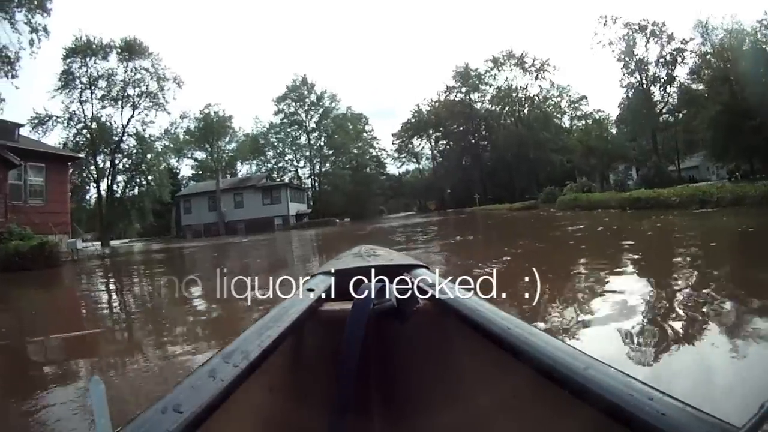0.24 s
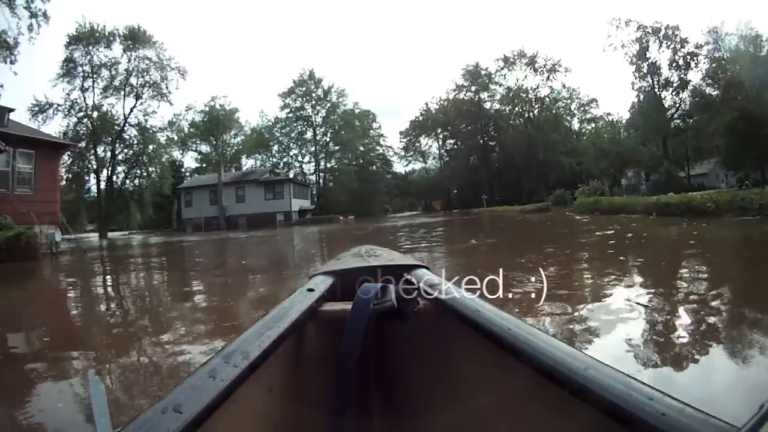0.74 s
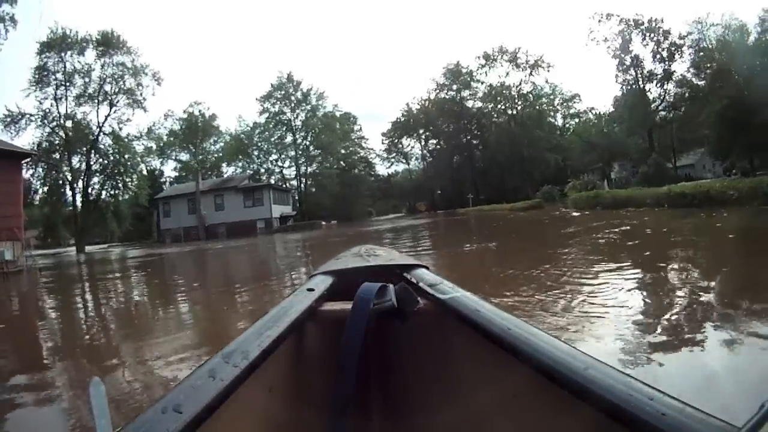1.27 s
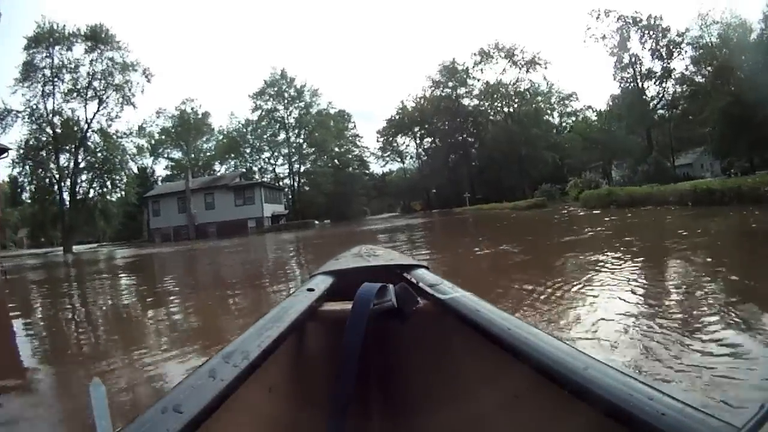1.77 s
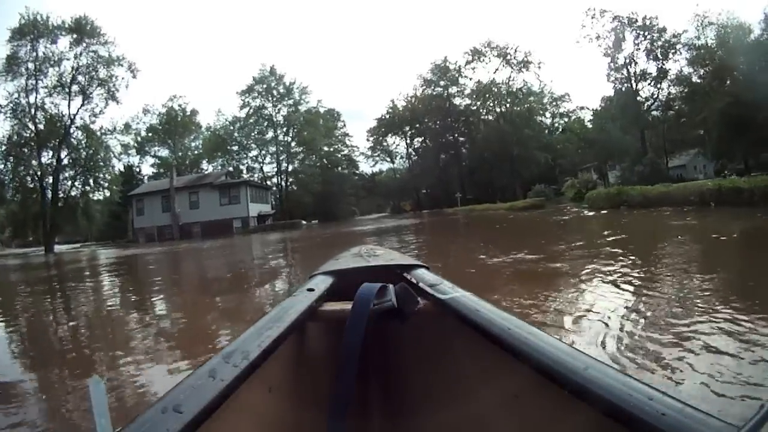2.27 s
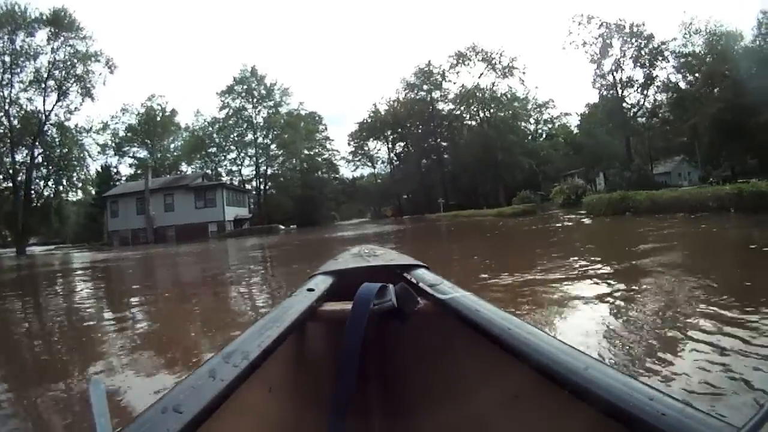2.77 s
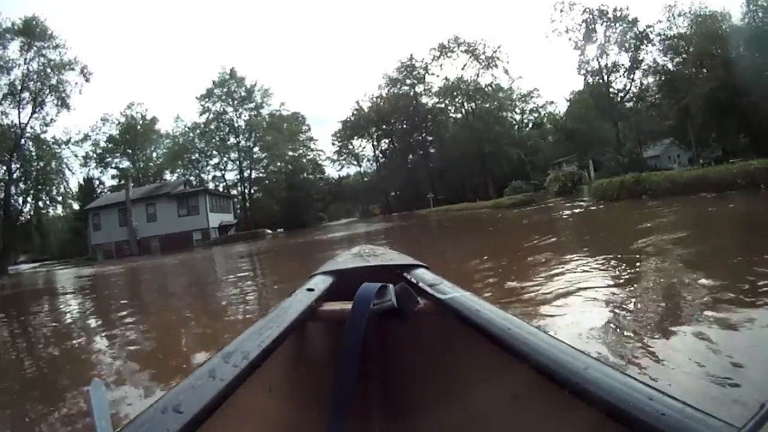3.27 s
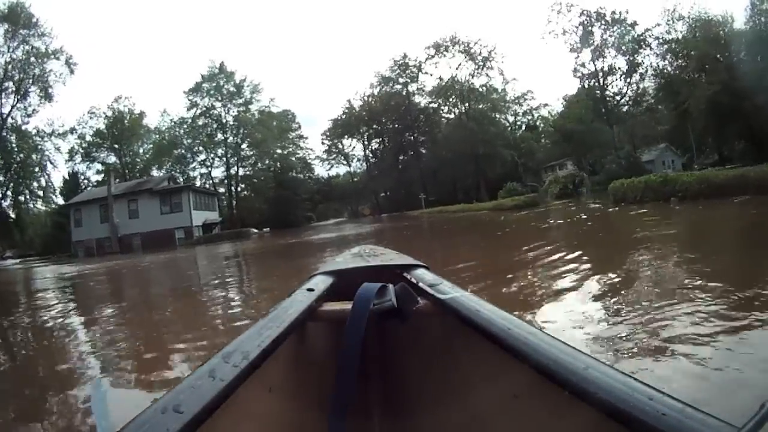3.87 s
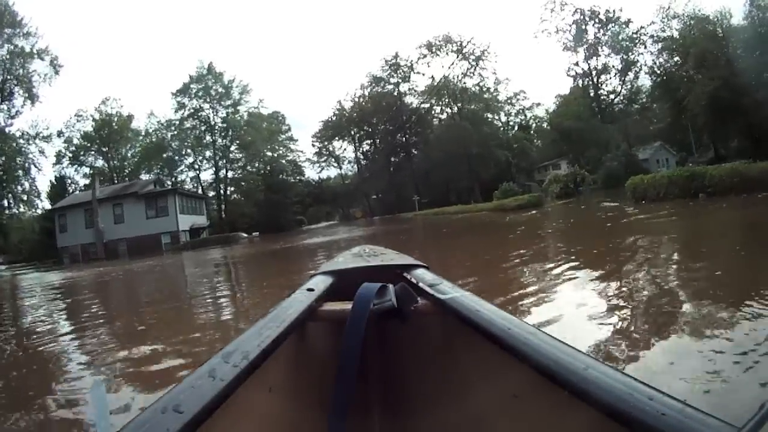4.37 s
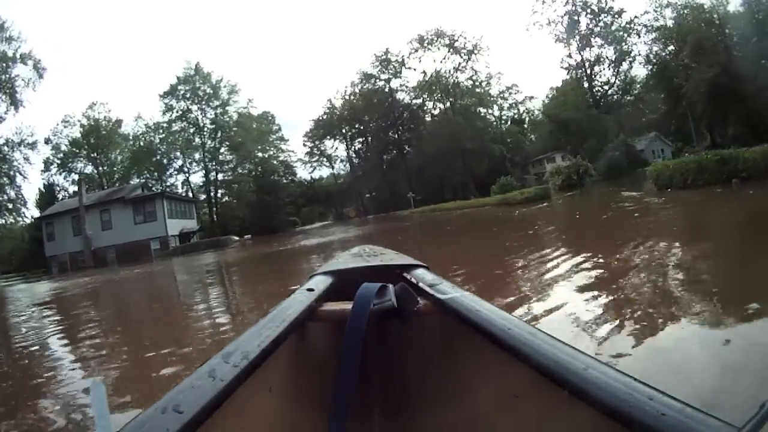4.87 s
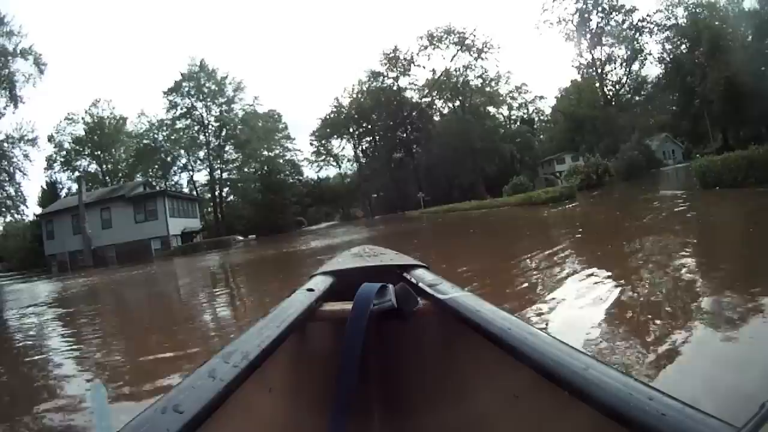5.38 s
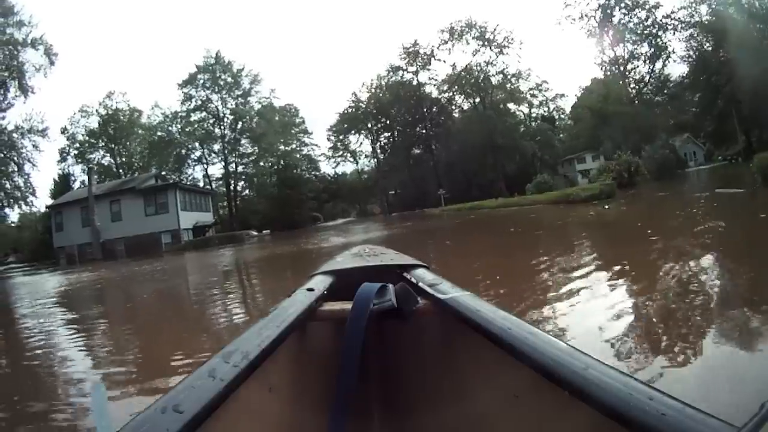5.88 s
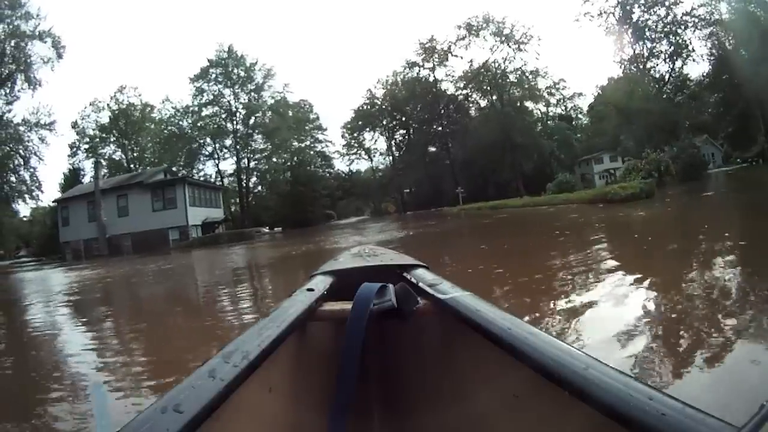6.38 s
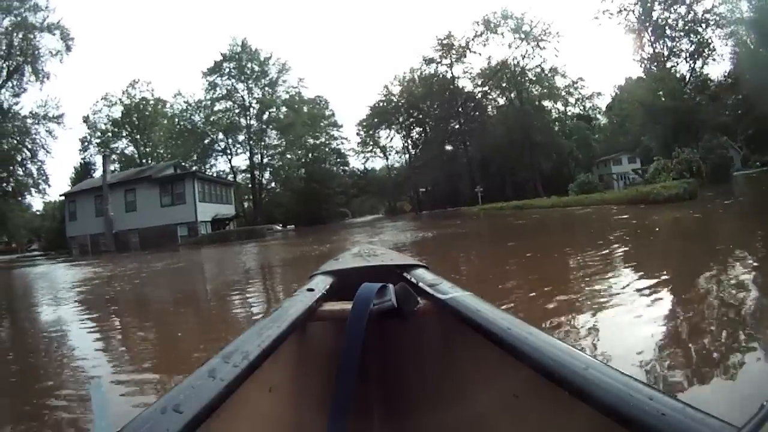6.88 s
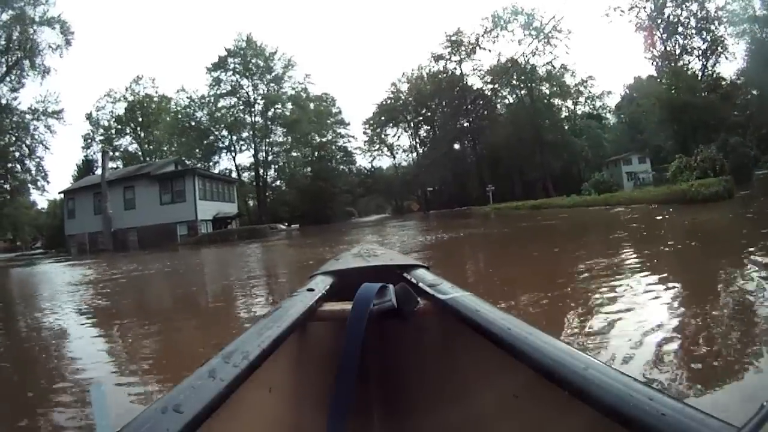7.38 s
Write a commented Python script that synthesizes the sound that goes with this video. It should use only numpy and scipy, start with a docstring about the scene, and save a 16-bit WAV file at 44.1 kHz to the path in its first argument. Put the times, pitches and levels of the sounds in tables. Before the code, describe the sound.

Inside a slowly paddled canoe on calm floodwater, a camera in a closed case near the bow picks up dull hull bumps. A soft thud bobs away at first, a strong deep boom comes around one second, then faint knocks, and another thud near six. Fine ripple crackle, bright drips and small hollow plops continue over a faint even wash.

```python
"""Slow canoe on calm floodwater

A canoe is paddled slowly, with the microphone of a camera in a closed case near the bow.
Soft bumps set the hull booming as decaying modes; it bobs, rumbles and stirs the water beside it.
Wavelets trap air against the hull and plop; near and tiny drops plink as bubbles; noise makes the wash.
The case colours every sound with its resonances; coarse sampling mirrors the band into the treble."""
import sys
import numpy as np
from scipy.fft import rfft, irfft, next_fast_len
from scipy.io import wavfile
from scipy.ndimage import uniform_filter1d, map_coordinates

SR = 44100
rng = np.random.default_rng(int(sys.argv[2]) if len(sys.argv) > 2 else 0)


def transcribe(signal):
    """Save signal, clipped to [-1, 1], as a 16-bit WAV file at the path in sys.argv[1]."""
    frames = np.atleast_2d(signal).T
    limited = np.clip(frames, -1, 1)
    pcm = np.round(limited * 32767).astype(np.int16)
    wavfile.write(sys.argv[1], SR, pcm)


N = 336483

# how rippled the water at the bow is: (t/s, level/dB before offsets)
RIPPLE_LEVEL = [(0.0, -61.5), (0.34, -61.5), (0.87, -60.5), (4.57, -65), (5.82, -63), (6.33, -65),
                (7.37, -61.5), (7.63, -61.5)]


def amp(db):
    """Decibels to gain."""
    return 10 ** (np.asarray(db) / 20)


def unit(x):
    """x scaled to rms 1."""
    return x / np.sqrt(np.mean(x ** 2) + 1e-20)


def add(track, s, sound):
    """Mix a sound into the track from time s on; what falls outside the track is cut off."""
    start = round(s * SR)
    part = sound[max(-start, 0):N - start]
    track[max(start, 0):][:len(part)] += part


def wobble(rate):
    """A smooth random curve, rate knots a second."""
    knots = rng.standard_normal(int(N * rate / SR) + 4)
    return map_coordinates(knots, [np.arange(N) * rate / SR])


def filtered(x, response):
    """x times a complex response of frequency."""
    size = x.shape[-1]
    m = next_fast_len(size + 8192)
    spectrum = rfft(x, m) * response(np.fft.rfftfreq(m, 1 / SR))
    return irfft(spectrum, m)[..., :size]


def coloured(x, spectrum):
    """x shaped by (f/Hz, level/dB) points, at rms 1."""
    hz, db = np.transpose(spectrum)
    return unit(filtered(x, lambda f: amp(np.interp(np.log(f + 1), np.log(hz), db))))


def resonance(f, hz, width):
    """Response of one damped resonator, 1 at its centre."""
    return 1j * f * width / (hz * hz - f * f + 1j * f * width)


def contacts():
    """Bumps, then the soft, even dips of the bobbing hull: (s, dB, corner Hz, side-wall dB, pressing s)."""
    # bumps on the hull: (t/s, level/dB, softness corner f/Hz, side-wall emphasis level/dB)
    knocks_felt = [(-.06, -45, 78.4, 5.5), (.893, -22.5, 57.5, -0.5), (1.441, -57, 94, 1),
                   (1.776, -42, 84.5, 1), (2.451, -59, 96, -4), (2.79, -47, 40.4, -10),
                   (3.433, -48.5, 86.5, 8.5), (3.85, -54.5, 115, -1), (4.335, -46.5, 68, -2.5),
                   (4.992, -54, 110, 5.5), (5.74, -36.5, 155, -22), (7.448, -52, 117, -8)]
    # spells of bobbing after a bump: (first dip t/s, level/dB, loss per dip level/dB)
    bobbing = [(0.101, -37.5, 5.5), (5.84, -44.5, .9)]
    # contact time at this softness corner; softer contacts press longer
    press_s, press_hz, press_slope = 0.076, 84, .6
    bob_period_s, bob_corner_hz, bob_side_db, bob_press_s = .29, 42, -9.5, 0.037
    knocks = [(s, db, hz, side_db, press_s * (press_hz / hz) ** press_slope)
              for s, db, hz, side_db in knocks_felt]
    dips = [(s + k * bob_period_s, db - k * loss_db, bob_corner_hz, bob_side_db, bob_press_s)
            for s, db, loss_db in bobbing for k in range(5)]
    return knocks + dips


def bumps(steepness=3.56, tilt=0.28, scatter_db=1.87):
    """Each bump bends the hull; slow low bending waves reach the bow last, so the boom falls in pitch."""
    # hull modes: (f/Hz, relative level/dB, 60 dB decay t/s, share of side-wall motion 0-1)
    hull_modes = [(38.52, 1.5, 0.85, 0.05), (41.44, 7, 0.11, 0.1), (47.2, -12, 0.13, 0.8),
                  (62.4, 3, 0.6, 0.79), (77.4, -3.5, 0.84, 0.07), (83.26, 1.5, 0.28, 0.6),
                  (88.86, 4.5, 0.46, 0.22), (108.8, -3, 0.53, 0.15), (125.8, 0.5, 0.25, 0.01),
                  (133.5, -4.5, 0.11, 0), (181.2, -6, 0.27, 0.4), (213, -3, 0.089, 0.34)]
    travel_cycles, swell_cycles = 1.6, 1.8
    out, t = np.zeros(N), np.arange(SR) / SR
    for s, db, corner_hz, side_db, press in contacts():
        chances = rng.standard_normal(len(hull_modes))
        for (hz, mode_db, t60, side), chance in zip(hull_modes, chances):
            age = np.maximum(t - travel_cycles / hz, 0)
            swell = 1 - np.exp(-(age * hz / swell_cycles) ** 2)
            ratio = hz / corner_hz
            # a soft contact misses the high modes and stops feeding them sooner
            push = ratio ** tilt / np.sqrt(1 + ratio ** (2 * steepness))
            driven = press / max(ratio, 1)
            fade_db = -60 * np.maximum(age - driven, 0) / t60
            level = amp(db + mode_db + side * side_db + scatter_db * chance + fade_db)
            add(out, s, push * swell * level * np.sin(2 * np.pi * hz * age))
    return out


def stirring(boom, db=-36):
    """The shaking hull stirs the water beside it: the stronger the boom, the louder the churning."""
    # spectrum of the churned water: (f/Hz, relative level/dB per Hz)
    churned = [(60, -15), (170, 3.5), (320, -8), (700, -10.5), (1400, -19), (2400, -15.5), (5000, -25)]
    # running rms of the boom over a twentieth of a second
    shaking = np.sqrt(np.abs(uniform_filter1d(boom ** 2, size=SR // 20)))
    return amp(db) * shaking * coloured(rng.standard_normal(N), churned)


def rocking(db=-57.0, swell_db=2):
    """Moving water keeps the hull rumbling faintly."""
    # spectrum of the rumble: (f/Hz, relative level/dB per Hz)
    rumble = [(8, -19), (22, -12.5), (38, -3), (53, -5), (64, -7), (82, -4), (92, -8), (108, -8.5),
              (130, -19.5), (220, -37)]
    return amp(db + swell_db * wobble(6)) * coloured(rng.standard_normal(N), rumble)


def water(wash_db=-60.5, fizz_db=-0.5, grain=0.36, trickle_db=0.43):
    """The flood's even wash, and the fine crackle of ripples at the bow, which comes in small swells."""
    # spectra of the wash and of the crackle: (f/Hz, relative level/dB per Hz)
    wash_spectrum = [(60, 1.5), (130, 0.5), (200, -3), (320, -6.5), (450, -10), (1000, -14), (1500, -20),
                     (2500, -33), (5000, -36.5)]
    fizz_spectrum = [(700, -13), (1500, -1.5), (2000, 0.5), (2700, -0.5), (4000, 3), (4800, -2), (5500, -1)]
    wash = amp(wash_db) * coloured(rng.standard_normal(N), wash_spectrum)
    grains = rng.standard_normal(N) * np.exp(grain * wobble(500))
    ripple_db = np.interp(np.arange(N) / SR, *np.transpose(RIPPLE_LEVEL)) + trickle_db * wobble(12)
    crackle = coloured(grains + 2 * rng.standard_normal(N), fizz_spectrum)
    return wash + amp(ripple_db + fizz_db) * crackle


def plink(hz, spray_db, glide=0.2, rise_s=0.0025, spray_follow=.4):
    """A trapped bubble rings and rises in pitch, with a puff of spray that is brighter for small bubbles."""
    t = np.arange(SR // 12) / SR
    t60 = 94 / hz  # a bubble dies away by 60 dB in 94 cycles of its first pitch
    tone = np.sin(2 * np.pi * hz * (t + glide * t * t / (2 * t60)))
    bright = (hz / 2500) ** spray_follow
    spray_points = [(500, -16), (1800, 2), (4300, 1.5), (8000, -15)]  # for a 2500 Hz bubble
    spray = coloured(rng.standard_normal(len(t)), [(f * bright, db) for f, db in spray_points])
    soft_start = 1 - np.exp(-(t / rise_s) ** 2)
    return (tone + amp(spray_db) * spray) * amp(-60 * t / t60) * soft_start


def drops(count=260, small_db=-67, scatter_db=3.5, middle_hz=2400, spread=.33):
    """Near drops from the paddle, among many tiny ones that grow louder where the water is rippled."""
    # near drops: (t/s, level/dB, bubble f/Hz, spray against the bubble level/dB)
    near_drops = [(.187, -51, 2480, -11), (.298, -60, 2080, 1), (.462, -48.5, 3120, -1),
                  (.47, -52.5, 2060, -3), (.743, -54, 2060, -12), (.985, -50, 3930, 4),
                  (1.115, -53, 1960, -18), (1.4, -54.5, 2240, 0), (1.619, -56, 1790, -5),
                  (2.113, -56.5, 2200, 0), (2.852, -55, 2420, -3), (5.199, -56.5, 2270, 3),
                  (5.922, -45.5, 4130, -6), (6.778, -53, 2740, -2), (7.022, -59, 2120, -4),
                  (7.16, -53, 2066, -4), (7.172, -59, 2080, 0), (7.206, -52, 3200, -5),
                  (7.218, -55, 1090, -14), (7.273, -51, 4200, -5)]
    out = np.zeros(N)
    for s, db, hz, spray_db in near_drops:
        add(out, s, plink(hz, spray_db) * amp(db))
    times, ripple_db = np.transpose(RIPPLE_LEVEL)
    starts = rng.uniform(0, N / SR, count)
    for s, (size, pitch) in zip(starts, rng.standard_normal((count, 2))):
        db = small_db + scatter_db * size + np.interp(s, times, ripple_db - ripple_db.mean())
        add(out, s, amp(db) * plink(middle_hz * np.exp(spread * pitch), spray_db=-6.0))
    return out


def slaps(breadth=1.5, fall=0.11, churn=0.73):
    """A wavelet traps a large and a small air pocket on the hull: sinking hollow plops in churned water."""
    # large pockets: (t/s of the fullest swell, level/dB, f/Hz at that moment)
    large = [(.075, -61, 543), (.717, -59.5, 604), (.803, -62, 700), (.947, -49, 1290), (1.483, -59, 571),
             (2.038, -59.5, 640), (2.572, -58, 361), (3.843, -60.5, 308), (6.591, -56, 344),
             (7.444, -61, 547), (7.606, -64, 800)]
    swell_cycles = 4  # a pocket swells for this many cycles, so low slaps last longer
    # the second, smaller pocket of each slap, against the large one
    small_ratio, small_lag_cycles, small_db = 1.75, 1.72, -4.5
    out, t = np.zeros(N), np.arange(SR // 4) / SR
    small = [(s + small_lag_cycles / hz, db + small_db, hz * small_ratio) for s, db, hz in large]
    for s, db, hz in list(large) + small:
        length = swell_cycles / hz
        u = t / length  # 1 at the fullest swell
        pitch = hz * np.exp(-fall * np.minimum(u - 1, 3))
        cavity = np.sqrt(2) * np.sin(2 * np.pi * np.cumsum(pitch) / SR)
        noise = rng.standard_normal(len(t))
        puff = unit(filtered(noise, lambda f: resonance(f, hz, breadth * hz) ** 2))
        plop = unit(cavity + churn * np.sqrt(swell_cycles) * puff)
        swell = u ** 2 * np.exp(2 * (1 - u))
        add(out, s - length, amp(db) * plop * swell)
    return out


def scene():
    """Hull and water reach both channels alike."""
    boom = bumps()
    middle = boom + stirring(boom) + rocking() + water() + drops() + slaps()
    return np.array([middle, middle])


def record(dry, band_hz=5680, hiss_db=-78.0):
    """The case rings; the camera holds each coarse sample, which mirrors the band about the sampling rate."""
    # resonances of the camera case: (f/Hz, width f/Hz, level/dB)
    case_modes = [(590, 72, 3), (1180, 107, 3.5), (2098, 146, 11), (2330, 171, 7.5), (3096, 200, 7),
                  (3637, 270, 5.5)]
    sampling_hz, top_hz = 12000, 15300

    def case(f):
        """The direct sound, raised around each resonance."""
        return np.prod([1 + (amp(db) - 1) * resonance(f, hz, width) for hz, width, db in case_modes], axis=0)

    def band_limit(f):
        """A steep low-pass ahead of the coarse sampling."""
        return 1 / np.sqrt(1 + (f / band_hz) ** 64)

    def hold(f):
        """Each coarse sample repeated for four finer steps, cut off at the top."""
        return np.sinc(f / sampling_hz) / np.sinc(f / (4 * sampling_hz)) * (f < top_hz)

    # each channel has its own hiss
    hiss_points = [(60, -59), (250, 2.5), (2200, -2.5), (5500, -1.0), (7000, -49)]
    hiss = coloured(rng.standard_normal((2, N)), hiss_points)
    inside = filtered(filtered(dry, case) + amp(hiss_db) * hiss, band_limit)
    mirrored = inside * (1 + 2 * np.cos(2 * np.pi * sampling_hz * np.arange(N) / SR))
    return filtered(mirrored, hold)


dry = scene()
out = record(dry)
transcribe(out)
```